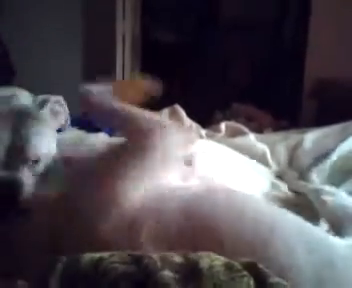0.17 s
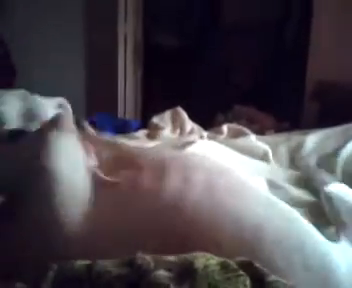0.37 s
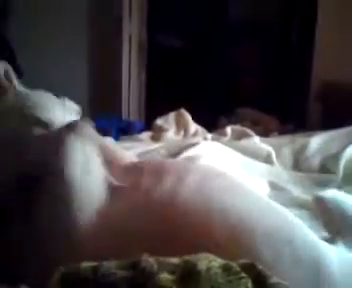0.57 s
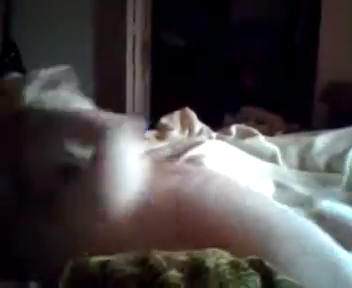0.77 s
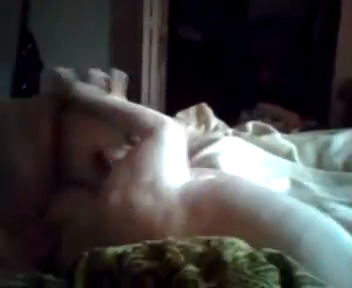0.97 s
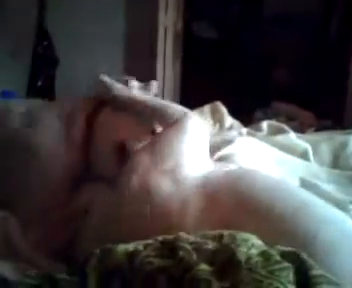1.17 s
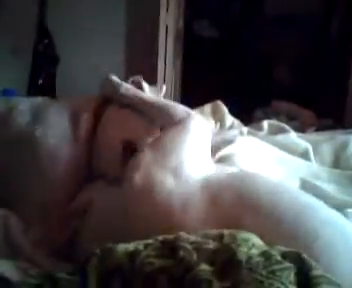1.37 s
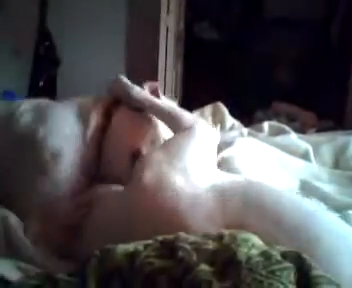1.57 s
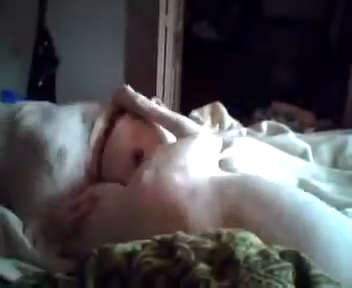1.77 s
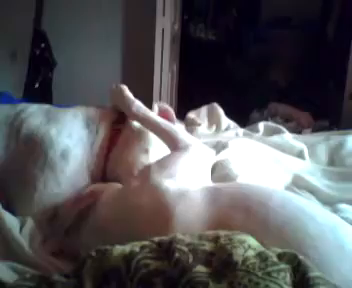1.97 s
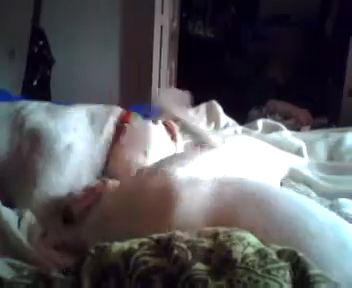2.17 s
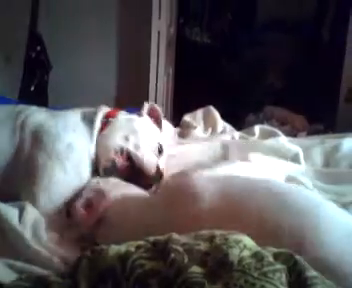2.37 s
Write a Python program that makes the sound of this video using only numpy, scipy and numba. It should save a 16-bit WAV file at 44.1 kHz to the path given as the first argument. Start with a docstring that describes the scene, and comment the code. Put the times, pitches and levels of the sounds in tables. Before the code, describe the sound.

Puppy growls, close and throaty. From 0.1 s a rattling growl flutters about 21 times a second, growing harsher with nasal rasps near 0.6 and 0.8 s. A strong burst at 0.9 s leads to a wavering low hum until 1.4 s, with teeth clicks around 1.2-1.3 and 1.65 s. After a lull near 1.75 s, softer growls return from 1.9 s, ending in breathy nose air. Quiet room, dull microphone.

```python
"""On a bed in a quiet room, two puppies wrestle near a small microphone.
Their growl is made of uneven throat pulses and air that ring the body, often in flaps about 21 a second.
A chesty hum near 155 Hz breaks through, made of a wavering sine with weak overtones.
Air rasps in the nose as bands of grainy noise; teeth click as short ringing tones.
Shaped noise makes the room, the breath and a faint treble hiss."""
import sys
import numpy as np
from scipy import signal
from scipy.fft import rfft, irfft
from scipy.io import wavfile
from numba import njit

SR = 44100
rng = np.random.default_rng(int(sys.argv[2]) if len(sys.argv) > 2 else 0)


def store_wav(level_fs):
    """Save 16-bit WAV to argv[1]."""
    pcm = np.round(np.clip(np.atleast_2d(level_fs), -1, 1) * 32767)
    wavfile.write(sys.argv[1], SR, pcm.T.astype(np.int16))


N = 110250  # samples, 2.5 seconds

# Levels in dB are starting values: the functions may add offsets and random flicker.
# Colour of the room noise. Each row: frequency in Hz, relative strength per Hz in dB.
ROOM_COLOUR = [(15, -35), (25, 2.5), (53, -4.5), (157, -20.5), (286, -18), (392, -17.5), (1000, -34),
               (6600, -49), (8000, -54), (10400, -100)]
# Bands of the treble hiss. Each row: centre in Hz, width setting in Hz, relative level in dB.
HISS_BANDS = [(3310, 1200, 5.5), (6770, 3300, -6.5)]
# Strength of the treble hiss. Each row: time in seconds, level in dB.
HISS_LEVELS = [(0, -80.5), (.5, -80), (.9, -84.5), (1.6, -80.5), (1.75, -89), (2.5, -83)]
# Growl in four body parts. Each row: time in seconds, then mouth, chest, belly and snout levels in dB.
GROWL_LEVELS = [(.06, -72, -63.5, -73, -72), (.11, -54.5, -57, -61, -61), (.25, -49.5, -43, -60, -56.5),
                (.6, -41.5, -40.5, -43.5, -43), (.83, -52, -53, -58, -48.5),
                (.88, -55.5, -43.5, -34.5, -53.5), (.99, -39.5, -39.5, -46, -43),
                (1.11, -58, -54, -52.5, -63), (1.19, -47, -40.5, -43, -48.5),
                (1.33, -38, -37.5, -38.5, -53), (1.57, -47.5, -52.5, -50, -47),
                (1.64, -49, -39.5, -49.5, -45.5), (1.68, -52.5, -47.5, -53, -50),
                (1.7, -70.5, -69, -67, -68), (1.83, -73, -61.5, -62, -72.5), (1.88, -54, -49, -54.5, -65),
                (2.01, -44, -48.5, -54.5, -45.5), (2.09, -56, -49.5, -49, -57),
                (2.2, -44, -40, -41.5, -43.5), (2.28, -55, -48, -58, -54.5), (2.36, -56.5, -48, -43, -49.5),
                (2.5, -56.5, -52, -66.5, -51)]
# Breath above the growl. Each row: time in seconds, level in dB.
BREATH_LEVELS = [(.1, -69.5), (.115, -55), (.15, -72), (.52, -63), (.545, -49), (.7, -56), (.83, -54.5),
                 (.865, -52), (.91, -46.5), (.99, -51), (1.11, -68), (1.35, -61.5), (1.5, -51.5),
                 (1.585, -61), (1.62, -81), (1.92, -73), (2.03, -69), (2.44, -65.5), (2.49, -57.5)]
# Flaps of the throat. Each row: start in seconds, then mouth, snout and chest levels in dB.
THROAT_FLAPS = [(0.11, -30, -36, -37), (0.121, -56, -36.5, -55), (0.162, -32.5, -43, -38),
                (0.208, -33.5, -56, -38), (0.265, -31.5, -51.5, -36.5), (0.3178, -28, -45, -35),
                (0.3605, -27, -36, -38), (0.4067, -35, -39, -45), (0.449, -31, -37.5, -35),
                (0.487, -34.5, -45, -32.5), (0.534, -38, -37, -45.5), (0.561, -29.5, -26, -63),
                (0.594, -53, -31.5, -40.5), (0.8815, -29, -51, -44.5), (0.9115, -23.5, -45, -35.5),
                (1.132, -36.5, -56.5, -40.5), (1.174, -28.5, -43.5, -52.5), (1.621, -42, -52, -46),
                (1.884, -38, -62, -40.5), (1.942, -39, -70, -42), (1.989, -37.5, -55, -36),
                (2.043, -40.5, -42, -40.5), (2.13, -51, -58, -45), (2.149, -41.5, -44.5, -40),
                (2.186, -40, -52, -51), (2.232, -39.5, -79, -39), (2.329, -39.5, -45.5, -40.5)]
# Moments when the throat partly shuts. Each row: middle in seconds, length setting in seconds.
THROAT_PAUSES = [(0.851, 0.0082), (1.599, 0.019), (1.928, 0.0091), (2.32, 0.0093)]
# Resonances of the body, one table a part.
# Each row: centre in Hz, width setting in Hz, relative level in dB.
BELLY_PEAKS = [(49.7, 114, -7.5), (103, 29, 0)]
CHEST_PEAKS = [(152.2, 65, -1.5), (229.4, 55, -1), (294, 68, -4), (426.2, 70, -13)]
MOUTH_PEAKS = [(530.2, 80.5, 3.66), (648.6, 38, 2), (768, 129, 3.6)]
SNOUT_PEAKS = [(960.5, 75.5, 5.5), (1140, 550, -9.5), (1061.4, 45, -6.5)]
BREATH_PEAKS = [(1308, 324, 6), (1781, 200, -6), (2100, 250, -5.5)]
# Wet rasps in the nose. Each row: start in seconds, level in dB, centre in Hz, length setting in seconds.
NOSE_RASPS = [(0.3145, -57.5, 3600, 0.016), (0.3615, -59, 3600, 0.015), (0.413, -62.5, 3700, 0.006),
              (0.455, -58, 3300, 0.008), (0.492, -54.5, 2900, 0.014), (0.316, -76.5, 6500, 0.013),
              (.368, -74, 6440, 0.0078), (0.496, -68, 6360, 0.0091), (0.567, -51, 3450, 0.047),
              (0.568, -56.5, 6420, 0.046), (0.792, -53.5, 2850, 0.062), (0.897, -67, 6000, 0.006),
              (0.9084, -59, 5300, 0.014), (0.9033, -58.5, 3900, 0.035), (.966, -65, 3400, .005),
              (0.449, -52.5, 3300, 0.006), (2.462, -59, 5530, 0.11), (2.457, -64, 3090, 0.087)]
# Chesty hum. Each row: time in seconds, pitch in Hz, level in dB.
HUM_PATH = [(.97, 147.3, -48), (.994, 149, -30), (1.008, 156.1, -17.5), (1.021, 151.2, -37.5),
            (1.03, 163.6, -26), (1.056, 165.8, -52), (1.14, 157.4, -61), (1.174, 152.2, -32),
            (1.206, 149.5, -29), (1.24, 176.9, -30), (1.29, 158.2, -31), (1.33, 131.8, -36.5),
            (1.345, 124, -30), (1.378, 144.5, -28.5), (1.41, 135, -48.5)]
# Overtones of the hum. Each row: multiple of the pitch, level against the main tone in dB.
OVERTONES = [(3, -22.5), (4, -20.5)]
# Teeth clicks. Each row: start in seconds, level in dB, brightness in dB per octave.
TEETH_CLICKS = [(1.1967, -32.5, -3.5), (1.2517, -29, -2), (1.31, -28, -0.5), (1.6507, -39.5, 4)]
# Ringing tones of a tooth. Each row: frequency in Hz, relative level in dB, seconds to fade by 60 dB.
TEETH_TONES = [(813, 9, 0.018), (1290, 7, 0.011), (1950, -8.5, 0.023), (2570, -12, 0.019),
               (3720, -27, 0.021)]

ROOM_DB, ROOM_FLICKER_DB = -62, 0.91
PULSE_HZ, JITTER, SCATTER_DB = 147.9, .35, 3.5  # typical rate, unevenness in time and in strength
FLAP_PULSE_DB, FLAP_PULSE_DELAY_S = 1.5, 0.00072
RESET_S = .005  # no ordinary pulses this close to a flap's firm pulse
BREATHY, PUFF_S = 0.55, .003  # share of breath noise, and how slowly each puff fades
FLAP_ATTACK_S, FLAP_T60_S = 0.0012, 0.058  # rise, and time to fade by 60 dB
MOUTH_FLAP_DB, FLAP_BREATH_DB = -6.5, -20
MOUTH_DB, SNOUT_DB, FLICKER_DB = -3, -4.5, 4.5  # the first two shift the levels between flaps
WANDER = 0.037  # typical drift of the resonances, as a share of their frequency
PAUSE_DB = -12
SLAP_S, SLAP_DB = .001, -1
RASP_WIDTH_HZ, RASP_GRAIN_DB, RASP_SWELL = 900, 3.5, 6.7
HUM_WAVER, HUM_FLICKER_DB, HUM_FADE_S = 0.015, 4, 0.016
TEETH_ATTACK_S, TEETH_DETUNE = .0006, 0.06
ECHO_T60_S, ECHO_DB, ECHO_DELAY_S = 0.21, -12.5, .004
SENSOR_DB = -101
MIC_STOP_HZ, FINAL_TOP_HZ = 8740, 15500


def undb(db):
    """Turn decibels into a plain multiplier."""
    return 10 ** (np.asarray(db) / 20)


def unit(x):
    """Scale a sound to an average (rms) strength of 1."""
    return x / np.sqrt(np.mean(x ** 2))


def noise():
    """Plain noise as long as the scene."""
    return rng.standard_normal(N)


def curve(rows, col):
    """Draw one table column over time with straight lines."""
    rows = np.array(rows)
    return np.interp(np.arange(N) / SR, rows[:, 0], rows[:, col])


def walk(rate):
    """Join random values, rate a second, with straight lines."""
    return np.interp(np.arange(N) * rate / SR, np.arange(1000), rng.standard_normal(size=1000))


@njit
def svf(x, g, k):
    """Band-pass whose centre may move; g = tan(pi f / SR), k = width / centre."""
    y, b, l = np.empty(len(x)), 0., 0.
    for i in range(len(x)):
        v = (b + g[i] * (x[i] - l)) / (1 + g[i] * (g[i] + k))
        b, l, y[i] = 2 * v - b, l + 2 * g[i] * v, k * v
    return y


def ring(x, peaks, wander=0):
    """Ring hollow spaces side by side; their pitches can drift as the jaw moves. Rms 1."""
    out = 0
    for k, (hz, width, db) in enumerate(peaks):
        f = np.tan(np.pi / SR * hz * (1 + wander * walk(11)))
        w = 1.225 * width / hz
        peak = svf(svf(x, f, w), f, w)  # two passes make steep sides
        out = out + (-1) ** k * undb(db) * unit(peak)
    return unit(out)


def room():
    """Steady background: noise coloured like the room, with a slight flicker."""
    f, table = np.arange(N // 2 + 1) * SR / N + 1, np.array(ROOM_COLOUR)
    shape = undb(np.interp(np.log(f), np.log(table[:, 0]), table[:, 1]))
    coloured = irfft(rfft(noise()) * shape, N)
    return unit(coloured) * undb(ROOM_DB + ROOM_FLICKER_DB * walk(24))


def flicker():
    """Quick random ups and downs in dB."""
    return FLICKER_DB * walk(39.69)


def treble_hiss():
    """Faint high noise in two bands that flickers."""
    return undb(curve(HISS_LEVELS, col=1) + 1.2 * flicker()) * ring(noise(), HISS_BANDS)


def glottis():
    """The throat folds give uneven pulses, a firm one at each flap, each with a puff of breath."""
    chance = rng.standard_normal(size=(2000, 2))
    gaps = SR / PULSE_HZ * np.exp(JITTER * chance[:, 0])
    at = np.cumsum(gaps).astype(int)
    firm = np.array([int((row[0] + FLAP_PULSE_DELAY_S) * SR) for row in THROAT_FLAPS])
    nearest_firm = np.abs(at[:, None] - firm).min(axis=1)
    keep = (at < N) & (nearest_firm > RESET_S * SR)
    pulses = np.zeros(N)
    pulses[at[keep]] = undb(SCATTER_DB * chance[keep, 1])
    pulses[firm] = undb(FLAP_PULSE_DB)
    puff = unit(signal.lfilter([1], [1, -np.exp(-1 / (PUFF_S * SR))], pulses))
    return unit(pulses) + BREATHY * puff * noise()


def flaps(col):
    """Loudness of all flaps in one body part: quick rise, then a smooth fall."""
    t, env = np.arange(N) / SR, 0
    for row in THROAT_FLAPS:
        u = np.maximum(t - row[0], 0)
        fall = undb(row[col] - 60 * u / FLAP_T60_S)
        env = env + fall * (1 - np.exp(-u / FLAP_ATTACK_S))
    return env


def breath_rush(pulses):
    """Noise and throat pulses ring the bands above the growl; flaps add to the rush."""
    rush = undb(curve(BREATH_LEVELS, col=1) + .5 * flicker())
    level = rush + undb(FLAP_BREATH_DB) * flaps(col=2)
    return level * ring(0.75 * pulses + noise(), BREATH_PEAKS)


def throat_opening():
    """Brief smooth dips in level as the throat partly shuts."""
    t = np.arange(N) / SR
    return undb(sum(PAUSE_DB * np.exp(-((t - s) / length) ** 2) for s, length in THROAT_PAUSES))


def growl():
    """Throat pulses ring belly, chest, mouth and snout; flaps boost the last three; breath rushes above."""
    pulses = glottis()
    belly_level = undb(curve(GROWL_LEVELS, col=3))
    chest_level = undb(curve(GROWL_LEVELS, col=2) + flicker()) + flaps(col=3)
    mouth_level = undb(curve(GROWL_LEVELS, col=1) + MOUTH_DB + flicker())
    mouth_level = mouth_level + undb(MOUTH_FLAP_DB) * flaps(col=1)
    snout_level = undb(curve(GROWL_LEVELS, col=4) + SNOUT_DB + flicker()) + flaps(col=2)
    belly = belly_level * ring(pulses, BELLY_PEAKS)
    chest = chest_level * ring(pulses, CHEST_PEAKS, WANDER)
    mouth = mouth_level * ring(pulses, MOUTH_PEAKS, WANDER)
    snout = snout_level * ring(pulses, SNOUT_PEAKS, .5 * WANDER)
    return throat_opening() * (belly + chest + mouth + snout + breath_rush(pulses))


def slaps():
    """A short push of air at the start of each flap."""
    starts = np.zeros(N)
    for row in THROAT_FLAPS:
        starts[int(row[0] * SR)] = undb(row[1] + SLAP_DB)
    u = np.arange(400) / SR / SLAP_S
    push = (np.e * u * np.exp(-u)) ** 2 * np.cos(np.pi * (u - 1))
    return np.convolve(starts, push)[:N]


def nose_air():
    """Grainy noise rasps in narrow nose bands; short ones start as ticks, long ones swell."""
    t, out = np.arange(N) / SR, 0
    grain = noise() * undb(RASP_GRAIN_DB * walk(300))
    for s, db, hz, length in NOSE_RASPS:
        u = np.clip((t - s) / length, 0, 9)
        swell = u / (u + RASP_SWELL * length) * np.exp(-2.5 * u ** 2)
        band = [(hz, RASP_WIDTH_HZ, 0)]
        out = out + 2 * undb(db) * swell * ring(ring(grain, band), band)
    return out


def hum():
    """A wavering, nearly pure chest tone with weak overtones."""
    t = np.arange(N) / SR
    pitch = curve(HUM_PATH, col=1) * (1 + HUM_WAVER * walk(70))
    phase = 2 * np.pi * np.cumsum(pitch) / SR
    tone = np.sin(phase)
    for multiple, db in OVERTONES:
        tone = tone + undb(db + 2 * walk(76)) * np.sin(multiple * phase)
    gate = np.clip(np.minimum(t - HUM_PATH[0][0], HUM_PATH[-1][0] - t) / HUM_FADE_S, 0, 1)
    level = undb(curve(HUM_PATH, col=2) + HUM_FLICKER_DB * walk(79.71))
    return np.sqrt(2) * level * gate * tone


def teeth():
    """Each click rings the same short tones, a little out of tune."""
    out, u = np.zeros(N), np.arange(2000) / SR
    rise = 1 - np.exp(-(u / TEETH_ATTACK_S) ** 2)
    for s, db, tilt_db in TEETH_CLICKS:
        k = int(s * SR)
        for hz, tone_db, t60 in TEETH_TONES:
            brightness = tilt_db * np.log2(hz / TEETH_TONES[0][0])
            fall = undb(db + tone_db + brightness - 60 * u / t60)
            tuned_hz = hz * (1 + TEETH_DETUNE * rng.standard_normal())
            out[k:k + len(u)] += rise * fall * np.sin(2 * np.pi * tuned_hz * u)
    return out


def echo(x):
    """The room returns a short tail of fading random reflections."""
    u = np.arange(8000) / SR
    tail = rng.standard_normal(len(u)) * undb(-60 * u / ECHO_T60_S) * (u > ECHO_DELAY_S)
    return undb(ECHO_DB) * signal.fftconvolve(x, tail / np.sqrt(np.sum(tail ** 2)))[:N]


def scene():
    """Add up the puppies, their echo and the room noise."""
    puppies = treble_hiss() + growl() + slaps() + nose_air() + hum() + teeth()
    return (puppies + echo(puppies) + room())[None]


def record(dry):
    """The microphone dulls the treble and adds faint hiss; the scene fades in its last 200 samples."""
    # at least 30 dB weaker above MIC_STOP_HZ
    x = signal.sosfilt(signal.cheby2(6, 30, MIC_STOP_HZ, fs=SR, output="sos"), dry)
    x = x * np.clip((N - np.arange(N)) / 200, 0, 1)
    x = x + undb(SENSOR_DB) * rng.standard_normal(x.shape)
    return signal.sosfilt(signal.ellip(8, .2, 30, FINAL_TOP_HZ, fs=SR, output="sos"), x)


dry = scene()
out = record(dry)
store_wav(out)
```